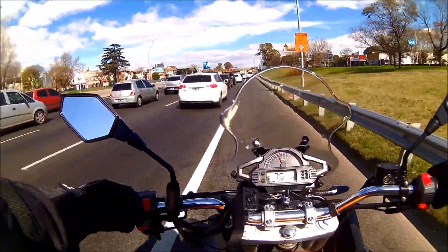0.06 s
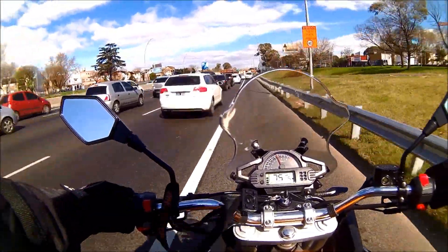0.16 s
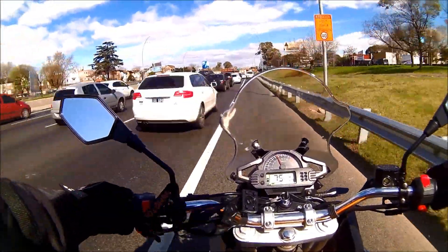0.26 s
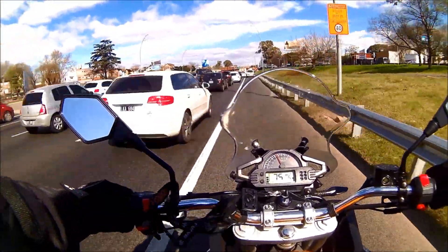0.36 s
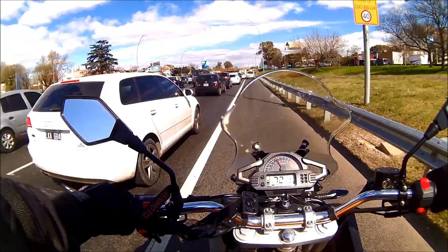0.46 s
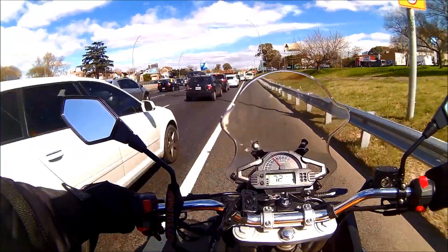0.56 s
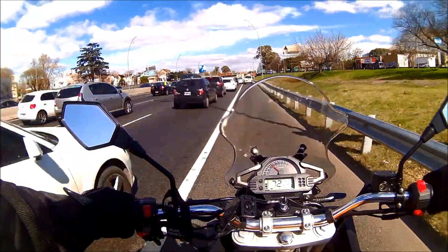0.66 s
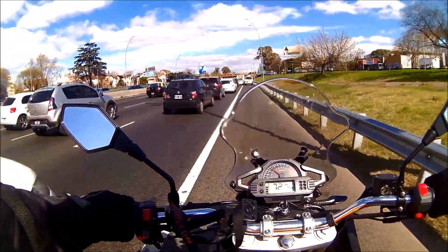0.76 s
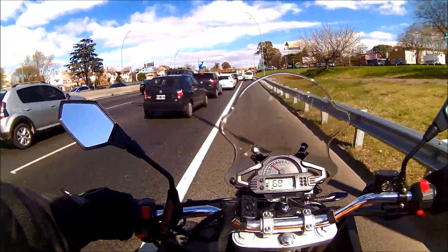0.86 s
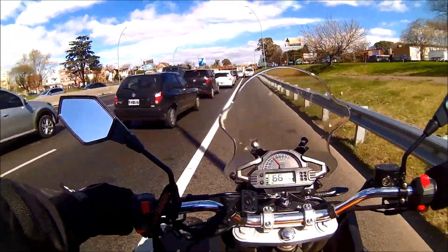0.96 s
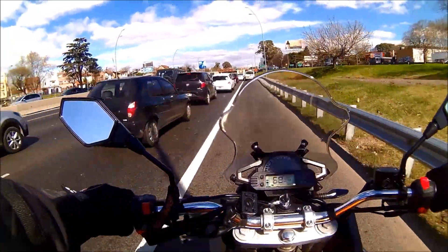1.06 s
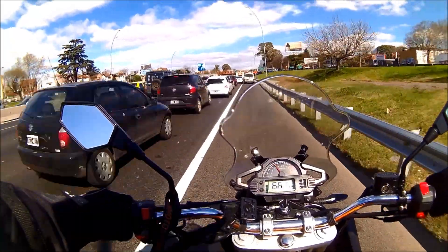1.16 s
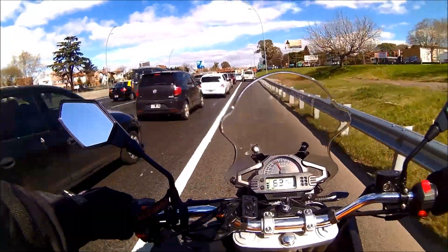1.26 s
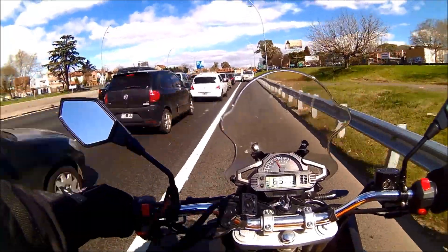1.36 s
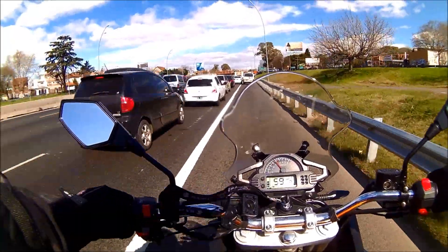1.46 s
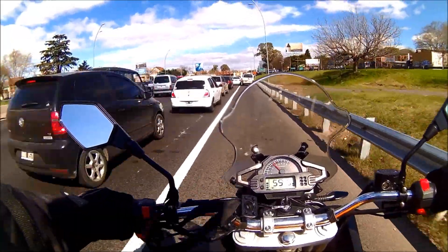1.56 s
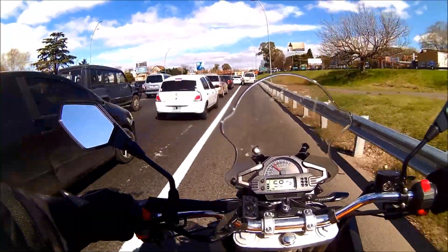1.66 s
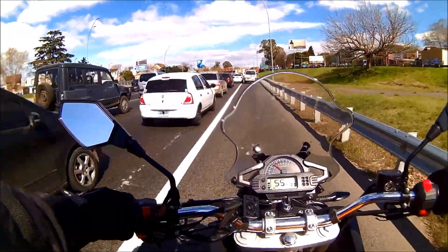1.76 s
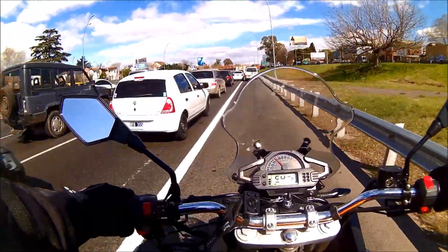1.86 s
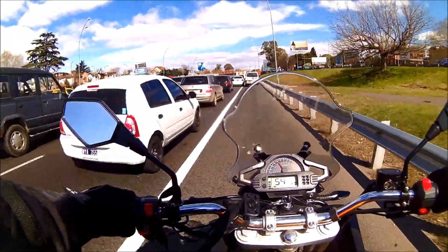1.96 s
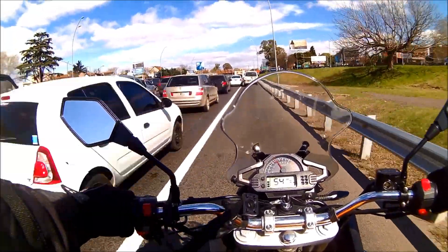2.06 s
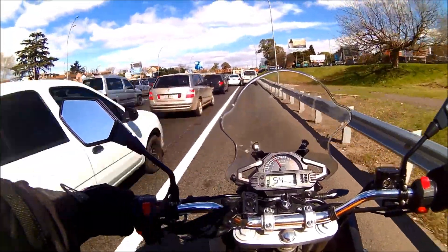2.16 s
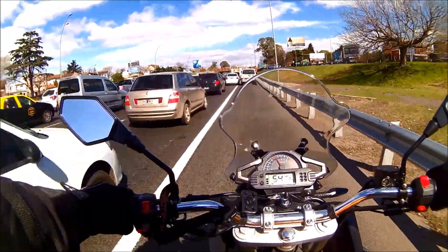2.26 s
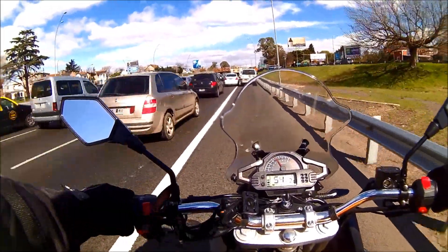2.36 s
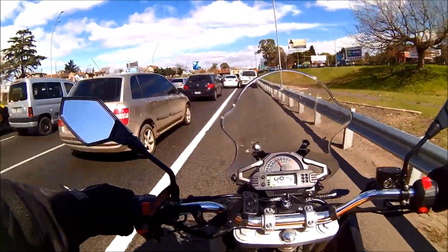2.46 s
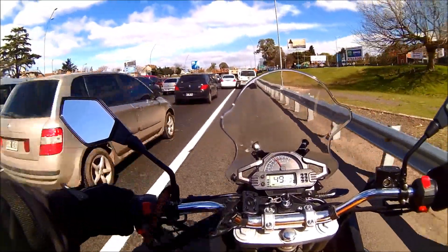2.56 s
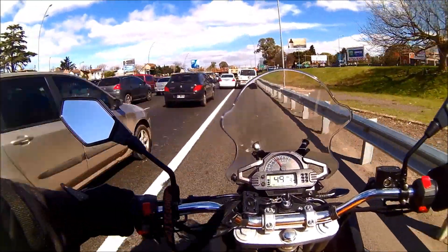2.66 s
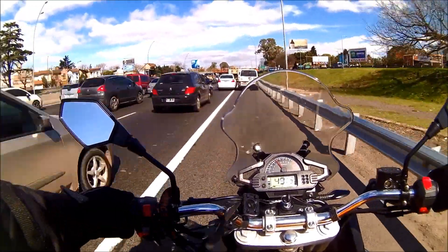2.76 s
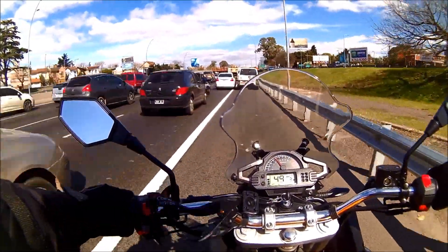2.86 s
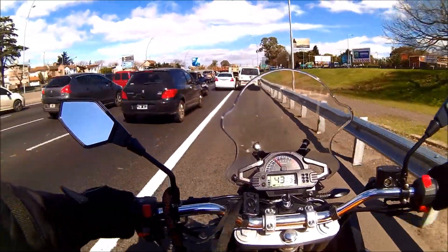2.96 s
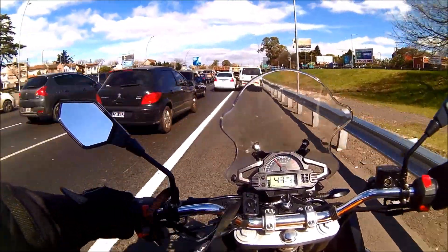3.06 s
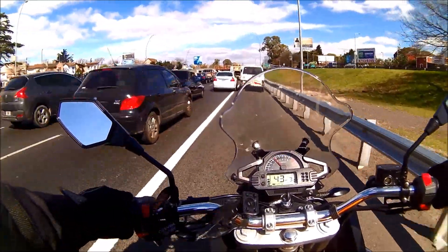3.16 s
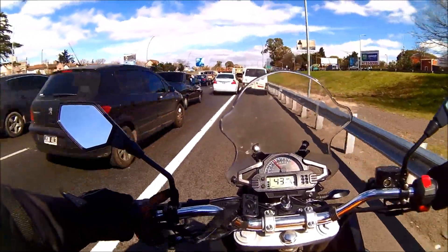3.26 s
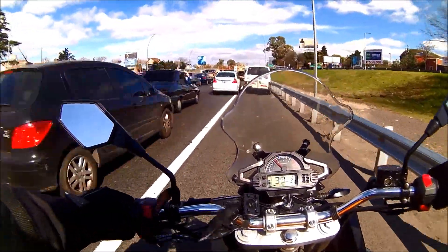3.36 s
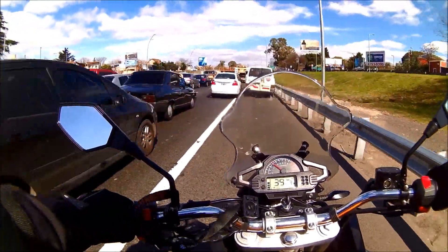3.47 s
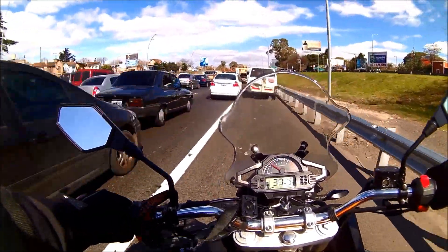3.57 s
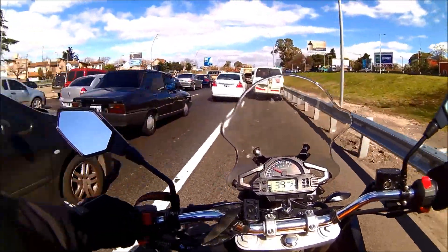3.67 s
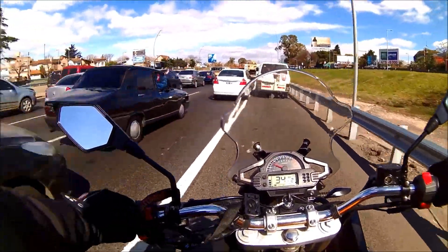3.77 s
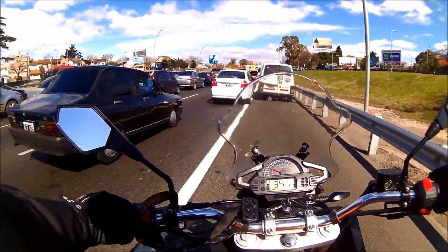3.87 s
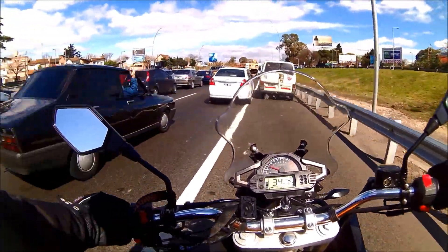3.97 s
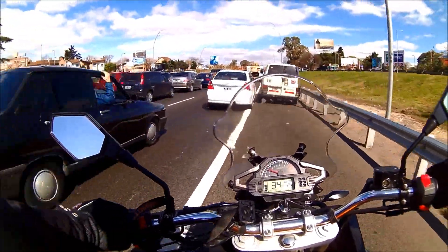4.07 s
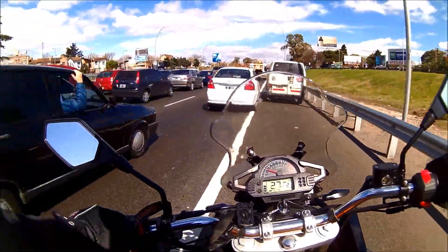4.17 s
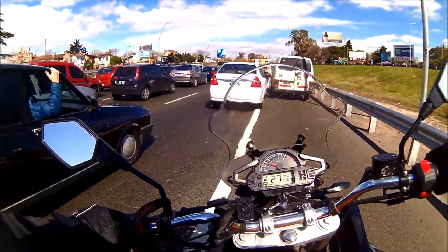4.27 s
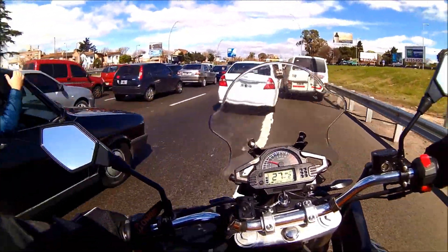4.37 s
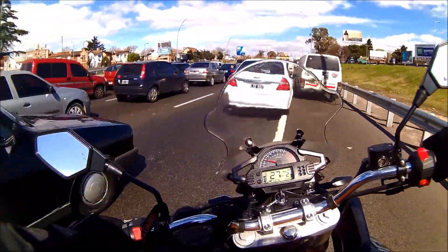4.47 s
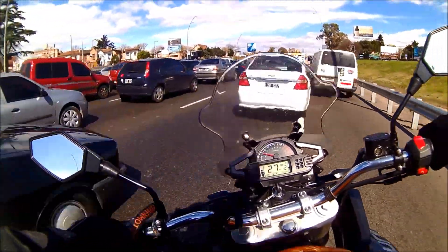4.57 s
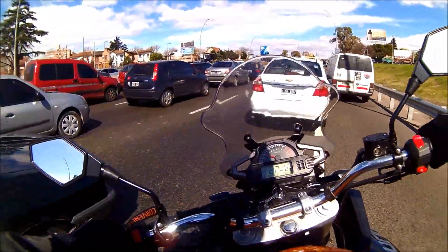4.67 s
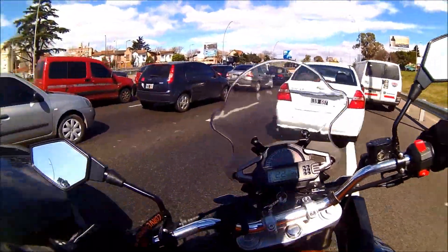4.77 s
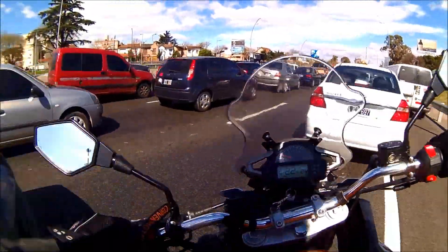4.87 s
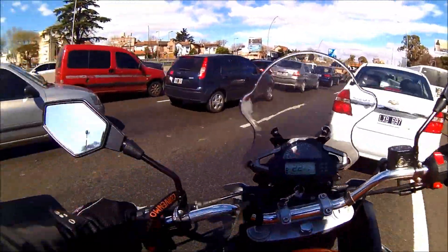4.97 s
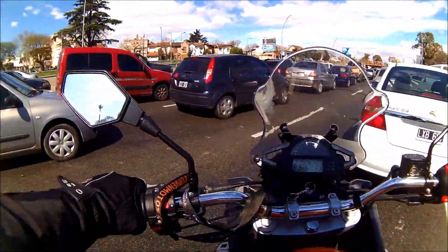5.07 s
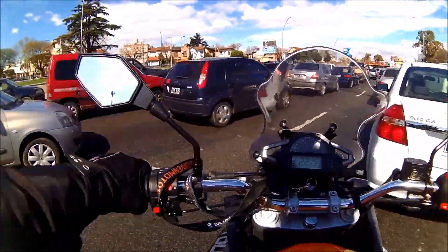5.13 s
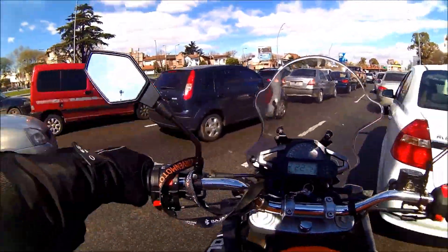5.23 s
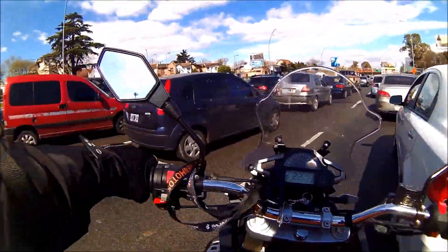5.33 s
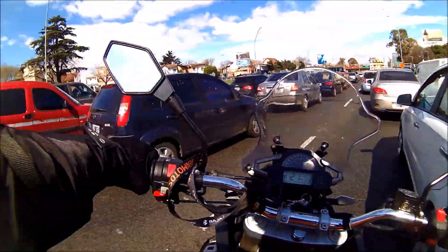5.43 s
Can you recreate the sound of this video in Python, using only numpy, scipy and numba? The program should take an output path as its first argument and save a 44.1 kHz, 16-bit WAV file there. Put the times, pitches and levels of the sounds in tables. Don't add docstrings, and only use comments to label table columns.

```python
import sys
import numpy as np
from scipy import signal
from scipy.fft import rfft, irfft
from scipy.io import wavfile
from scipy.ndimage import uniform_filter1d
from numba import njit

SR = 44100
rng = np.random.default_rng(int(sys.argv[2]) if len(sys.argv) > 2 else 0)


def transcribe(u):
    v = np.clip(np.atleast_2d(u).T, -1, 1)
    q = np.round(v * 32767).astype(np.int16)
    wavfile.write(sys.argv[1], SR, q)


def to_linear_factor(level_db):
    exponent = np.asarray(level_db, float) / 20
    return 10 ** exponent


N = 242550
TIME = np.arange(N) / SR

# time in seconds, firing rate in Hz.
FIRING_RATE = [(0.0, 48.94), (0.5, 45.61), (0.913, 47.82), (1.379, 42.8), (1.786, 47.96), (2.345, 43.65),
               (3.249, 33.02), (3.475, 25.02), (3.695, 21.12), (4.145, 17.08), (4.35, 18.6), (4.504, 16.71),
               (4.765, 21.15), (4.975, 37.83), (5.151, 27.66), (5.241, 26.76), (5.399, 32.28), (5.5, 31.42)]
# time in seconds, opening from 0 to 1, silencer resonance in Hz.
THROTTLE = [(0, 0.8, 340), (1.4, 0.35, 349), (2.1, 0.8, 295), (2.95, 0.48, 294), (3.2, 0.41, 307),
            (3.45, 0.04, 357), (3.65, 0, 353), (4.55, 0, 364), (4.72, 0.1, 336), (4.86, 0.62, 330),
            (4.98, 0.99, 364), (5.07, 0.89, 344), (5.15, 0.15, 332), (5.22, 0.76, 288), (5.36, 0.96, 304),
            (5.5, 0.97, 302)]
# frequency in Hz, T60 in seconds, level in dB, place in the cycle from 0 to 1.
VALVE_MODES = [(8240, 0.034, 0.5, 0.1), (9250, 0.02, -5.5, 0.2), (10350, 0.015, -0.5, .75),
               (11700, .02, -17, .75)]
TICK_DB = (-59.5, -65)
# middle in seconds, length in seconds, first pair of modes in dB,
# second pair in dB.
TAPPET_SPELLS = [(.07, .12, -1, 9), (.3, .08, 2, 10), (.68, 0.35, -9, -13), (.93, .15, -1, 8),
                 (1.06, .08, 1, 12), (1.18, 0.14, 4, -6), (1.365, .04, 6, 8), (1.58, .2, -5, -10),
                 (1.96, 0.33, 2, 10), (2.42, .08, 4, 4), (3.244, .04, 9, 3), (3.51, .03, 12, 8),
                 (5.0, .2, -3, 10)]
# time in seconds, roar level in dB.
ROAR_LEVEL = [(0, -24.5), (.3, -28), (1.28, -28), (1.43, -31.5), (1.62, -31.5), (1.71, -27.5), (1.87, -29),
              (2.25, -27.5), (2.45, -30), (2.8, -30), (3.32, -36), (3.94, -41), (4.26, -41), (4.86, -37.5),
              (4.95, -35), (5.33, -35.5), (5.5, -31)]
# frequency in Hz, density in dB per Hz.
ROAR_SPECTRUM = [(200, 9), (450, 3), (650, -1), (1000, 1), (1420, -3.5), (2000, -2), (2800, -7.5),
                 (3200, -16), (4000, -23.5), (5400, -25), (6000, -35), (8000, -36), (12000, -42.5),
                 (15500, -52)]
# frequency in Hz, width in Hz, level over the direct sound in dB.
HOUSING_MODES = [(721, 71, 3.5), (800, 75, 1), (1192, 178, 1), (1719, 303, 7), (1868, 190, -3),
                 (2117, 340, -2), (2425, 460, -8), (3460, 140, -7.5), (5010, 720, -3)]
# time in seconds, pressure level in dB.
WIND_LEVEL = [(0, -19), (.9, -22), (1.0, -22.5), (1.4, -23.5), (1.9, -23.5), (2.3, -22.5), (2.6, -30),
              (3.1, -31), (3.5, -38), (3.85, -47), (4.5, -49), (5.5, -37)]
# frequency in Hz, density in dB per Hz.
BUFFET_SPECTRUM = [(9, -45), (18, -40), (35, -9), (60, -1.5), (100, 1), (140, -7), (200, -7.5), (300, -9),
                   (420, -18), (600, -23.5), (1500, -34)]
# peak in seconds, level over the steady wind in dB, build-up in seconds.
GUSTS = [(.15, 3.5, 0.068), (.335, 11, 0.076), (.57, 8, 0.085), (.65, 1, 0.036), (.78, 2, 0.038),
         (0.881, 11, 0.046), (.985, -11.5, 0.062), (1.21, 2, 0.13), (1.32, 6, 0.064), (1.41, 7.5, 0.06),
         (1.7, 8, 0.12), (1.81, 7.5, 0.037), (1.97, -7, .08), (2.05, 8, 0.043), (2.12, 8, .07),
         (2.18, 7, 0.058), (2.23, 7.5, .04), (2.37, 8, 0.027), (2.44, 12, 0.046), (2.67, 6.5, 0.11),
         (2.76, 13.5, 0.043), (3.06, 9, 0.03), (3.97, 15, .06), (4.78, 3.5, 0.28), (5.33, 8, .08)]
# start in seconds, peak in dB, bright part relative to it in dB,
# length in seconds.
CLUNKS = [(0.093, -22.5, -39, 0.055), (0.354, -24.5, -28, 0.075), (0.526, -24, -27, 0.042),
          (0.584, -24, -35, 0.094), (1.354, -24, -29, 0.13), (1.396, -27, -29, 0.079),
          (1.49, -37, -10, .04), (2.112, -27, -22, 0.035), (2.222, -28, -26, 0.053),
          (3.505, -26, -29, 0.083), (3.73, -34, -31, 0.056), (4.836, -33, -33, 0.075),
          (4.92, -29, -31, 0.22)]
# time in seconds, peak in dB, frequency in Hz, T60 in seconds.
LEVER_TICKS = [
    (4.5612, -25, 1700, .035),
    (4.566, -35, 3050, .03),
]
# time in seconds, peak in dB.
SNAPS = [
    (5.3293, -4.5),
    (5.4954, -14.5),
]
# frequency in Hz, T60 in seconds, level in dB.
SNAP_MODES = [(1390, 0.0039, 2), (2080, 0.0022, 1.5), (2510, 0.018, -5.5)]
# frequency in Hz, rms level in dB.
WHISTLES = [(12193, -91), (12285, -89), (12382, -87), (12478, -87), (12526, -80), (12574, -81),
            (12764, -89), (12861, -89)]
# frequency in Hz, density in dB per Hz.
HISS_SPECTRUM = [(2000, 1), (6000, 6), (10000, 7.6), (13000, 6.5), (15700, 3.9)]


def level(x, db):
    return x * to_linear_factor(db) / np.sqrt(np.mean(x ** 2))


def curves(table):
    seconds, *columns = np.transpose(table)
    return [np.interp(TIME, seconds, column) for column in columns]


@njit
def svf(x, hz, width):
    y, b, l = np.empty(len(x)), 0., 0.
    for i in range(len(x)):
        g, k = np.tan(np.pi * hz[i] / SR), width / hz[i]
        v = (b + g * (x[i] - l)) / (1 + g * (g + k))
        b, l, y[i] = 2 * v - b, l + 2 * g * v, k * v
    return y


def band(x, hz, width):
    return svf(x, hz + np.zeros(N), 1. * width)


def double_band(x, hz, width):
    return band(band(x, hz, width), hz, width)


def swell(x, hz, width):
    hz = hz + np.zeros(N)
    dying = double_band(x, hz, width)[::-1].copy()
    return double_band(dying, hz[::-1], width)[::-1] * 2 * SR / (np.pi * width)


def ring(x, hz, t60):
    pole = np.exp(2j * np.pi * hz / SR - np.log(1000) / (t60 * SR))
    return signal.lfilter([1], [1, -pole], x).imag


def walk(rate):
    k = int(SR / rate)
    held = np.repeat(rng.standard_normal(N // 100)[:N // k + 1], k)
    return uniform_filter1d(uniform_filter1d(held, k), k)[:N]


def colour(x, table):
    hz, db = np.transpose(table)
    bins_hz = np.arange(N // 2 + 1) * SR / N
    return irfft(rfft(x) * to_linear_factor(np.interp(np.log(bins_hz + 1), np.log(hz), db)), N)


def beats(cycles, place, jitter_s, scatter_db):
    chance = rng.standard_normal((400, 2))
    turn = np.arange(np.ceil(cycles[0]), cycles[-1] - place)
    at = np.interp(turn + place, cycles, TIME) + jitter_s * chance[:len(turn), 0]
    out = np.zeros(N)
    out[np.clip(at * SR, 0, N - 1).astype(int)] = to_linear_factor(scatter_db * chance[:len(turn), 1])
    return out


def engine_cycles():
    hz, = curves(FIRING_RATE)
    cycles = np.cumsum(hz) / SR
    return cycles - np.interp(5.0117, TIME, cycles), hz


def exhaust(cycles):
    opening, ring_hz = curves(THROTTLE)
    opening = np.clip(opening, 0, 1)
    pulling = np.minimum(opening / .4, 1)
    early_cycles = .035 * (1 - pulling)
    blow = beats(cycles + early_cycles, 0, jitter_s=.00015, scatter_db=1.2)

    suck_lead_s, suck_db = 0.00528, -14.5
    suck = np.roll(swell(blow, 225, 340), -int(suck_lead_s * SR))
    boom_hz = 98.3 + 46 * opening ** 0.85
    boom = swell(blow, boom_hz, width=93) - to_linear_factor(suck_db) * suck

    idle_swings, open_swings = 3.37, 1.112
    swings = idle_swings + (open_swings - idle_swings) * np.sqrt(pulling)
    silencer = np.interp(TIME - swings / ring_hz, TIME, swell(blow, ring_hz, width=142))

    tail_hz = 513
    tail = np.roll(swell(blow, tail_hz, width=150), int(SR / tail_hz))

    boom_db = -29.5 + 7 * pulling
    silencer_db = -32.5 + 11.5 * opening
    tail_db = -45 + 19.5 * opening
    return to_linear_factor(boom_db) * boom + to_linear_factor(silencer_db) * silencer + to_linear_factor(tail_db) * tail


def relative_roar_db():
    cruise_db = -26.5
    return curves(ROAR_LEVEL)[0] - cruise_db


def valves(cycles, hz):
    tick_db = np.array(TICK_DB)[:, None] + 1.26 * relative_roar_db()
    for middle, length, *db in TAPPET_SPELLS:
        spell = np.exp(-(2 * (TIME - middle) / length) ** 2)
        tick_db = tick_db + spell * np.array(db)[:, None]
    out = 0
    for k, (f, t60, db, place) in enumerate(VALVE_MODES):
        opening = beats(cycles, place, jitter_s=.0005, scatter_db=2.5)
        closing = beats(cycles, (place + .47) % 1, jitter_s=.002, scatter_db=4.)
        metal = level(ring(opening + 0.27 * closing, f, t60) / np.sqrt(hz), -0.89)
        buzz = level(band(rng.standard_normal(N), f, 150), -5)
        out = out + (metal + buzz) * to_linear_factor(db + tick_db[k // 2] + 1.5 * walk(9))
    return out


def housing(x):
    return x + sum(to_linear_factor(db) * double_band(x, f, width) for f, width, db in HOUSING_MODES)


def gusts():
    drop_s = 0.022
    return sum(db * np.interp(TIME, (s - rise, s, s + drop_s), (0, 1, 0)) for s, db, rise in GUSTS)


def roar(cycles):
    throttle = uniform_filter1d(curves(THROTTLE)[0], size=SR // 4)
    intake_hiss_db = 4 * (throttle - .5)
    treble_db = -46.5 + 0.79 * relative_roar_db() + intake_hiss_db
    low_db = curves(ROAR_LEVEL)[0] + 0.15 * gusts()
    throb = 1 + 0.11 * np.cos(2 * np.pi * cycles)
    noise = housing(colour(rng.standard_normal(N), ROAR_SPECTRUM)) * throb * to_linear_factor(1.32 * walk(22.11))
    high_pass = signal.butter(4, 3300, "high", fs=SR, output="sos")
    high = signal.sosfiltfilt(high_pass, noise)
    low = level(noise - high, 3.7)
    return to_linear_factor(low_db) * low + to_linear_factor(treble_db + 0.6 * walk(8.4)) * level(high, 1.56)


def wind():
    gust_db = gusts()
    bright_db = -0.5 * np.maximum(gust_db, 0)
    bright_db = bright_db - bright_db[:2 * SR].mean()
    noise = colour(rng.standard_normal(N), BUFFET_SPECTRUM)
    shared, out = walk(24.63), 0
    for hz in 20 * 2 ** np.arange(0, 6.1, .5):
        tilt_db = np.clip(np.log2(hz / 130), 0, 1) * bright_db
        flutter_db = 1.6 * shared + 2 * walk(14)
        out = out + double_band(noise, hz, hz * .55) * to_linear_factor(tilt_db + flutter_db)
    return to_linear_factor(curves(WIND_LEVEL)[0] + gust_db + 2.0) * level(out, 0)


def clunks():
    dull, bright = np.zeros(N), np.zeros(N)
    for s, db, bright_db, length in CLUNKS:
        age = np.clip(TIME - s, 0, 1)
        length = max(length, .005)
        attack = 1 - np.exp(-age / (0.016 * length))
        fade = attack * np.exp(-np.log(1000) * age / length)
        dull += to_linear_factor(db) * fade
        bright += to_linear_factor(db + bright_db) * fade
    noise = rng.standard_normal((2, N))
    knock = housing(double_band(noise[0], 1860, 2000))
    edge = double_band(noise[1], 7400, 6000)
    return dull * level(knock, 0) + bright * level(edge, 1.5)


def snaps():
    hits = np.zeros(N)
    for s, db in SNAPS:
        hits[int((s + .0004) * SR)] = -to_linear_factor(db - 9.0)
    hits = hits + 1.7 * np.roll(hits, int(0.0005 * SR)) + .5 * np.roll(hits, int(0.00269 * SR))
    plastic = sum(to_linear_factor(db) * ring(hits, f, t60) for f, t60, db in SNAP_MODES)
    case = signal.butter(5, (950, 2950), "band", fs=SR, output="sos")
    return signal.sosfilt(case, plastic)


def lever():
    out = np.zeros(N)
    for s, db, f, t60 in LEVER_TICKS:
        blow = 1. * (np.arange(N) == int(s * SR))
        out += to_linear_factor(db) * ring(blow, f, t60)
    return out


def electronics():
    hiss = level(colour(rng.standard_normal(N), HISS_SPECTRUM), -64)
    for f, db in WHISTLES:
        hiss = hiss + to_linear_factor(db) * np.sqrt(2) * np.sin(2 * np.pi * (f * TIME + rng.random()))
    return hiss


def scene():
    cycles, hz = engine_cycles()
    engine = exhaust(cycles) + valves(cycles, hz)
    knocks = clunks() + snaps() + lever()
    return (engine + roar(cycles) + wind() + knocks + electronics())[None]


def low_pass(x):
    return signal.sosfilt(signal.butter(12, 15740, fs=SR, output="sos"), x)


def record(dry):
    return low_pass(dry)


dry = scene()
out = record(dry)
transcribe(out)
```